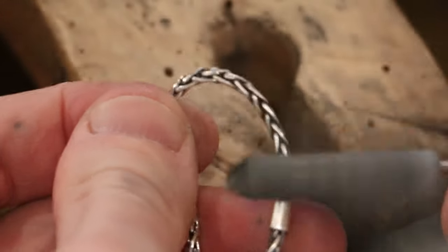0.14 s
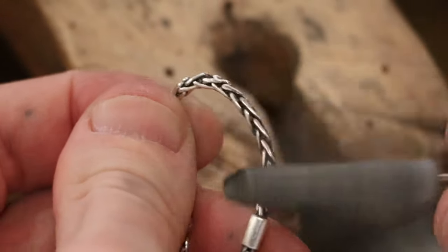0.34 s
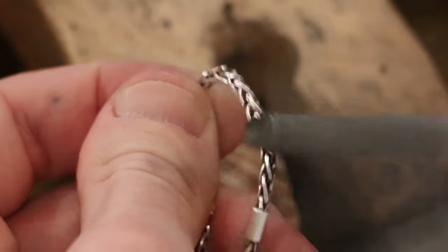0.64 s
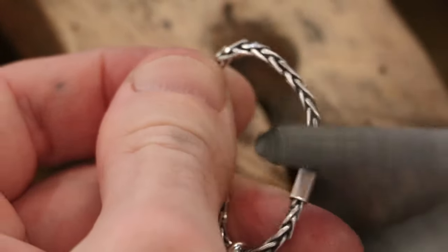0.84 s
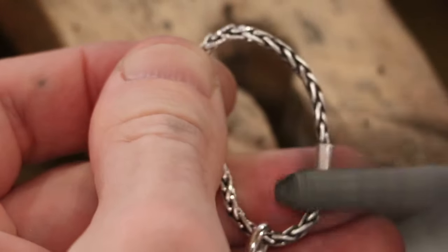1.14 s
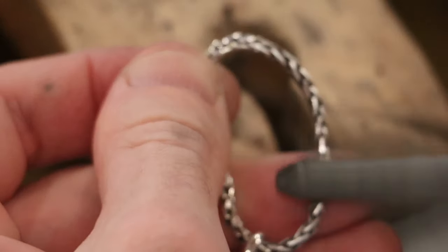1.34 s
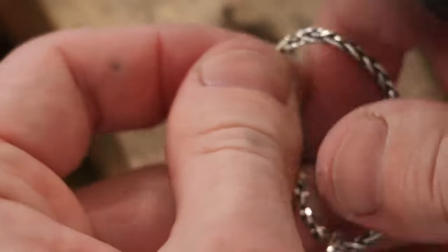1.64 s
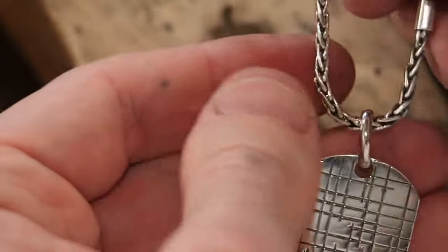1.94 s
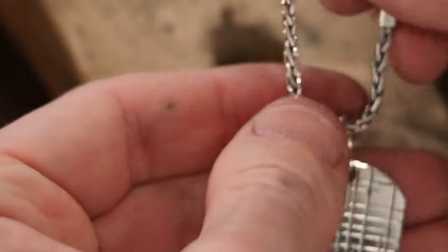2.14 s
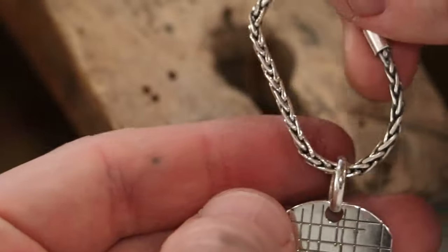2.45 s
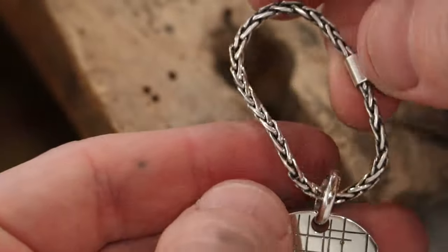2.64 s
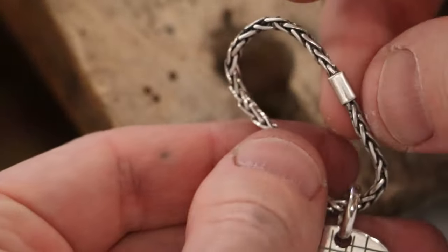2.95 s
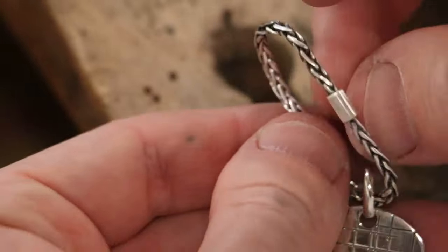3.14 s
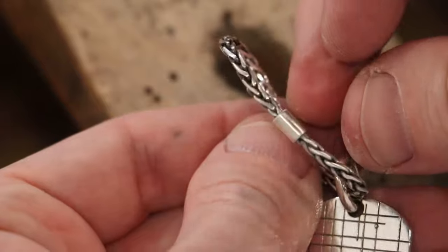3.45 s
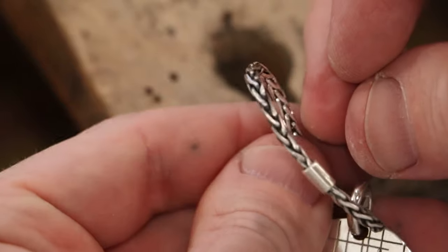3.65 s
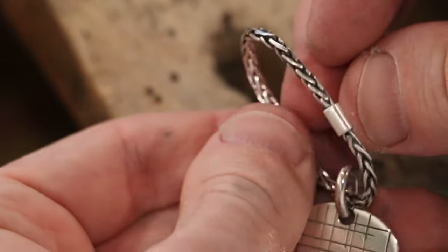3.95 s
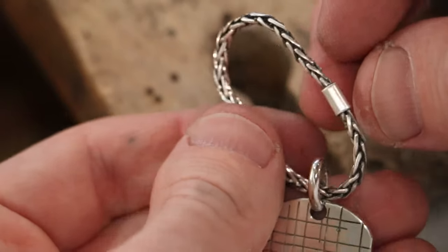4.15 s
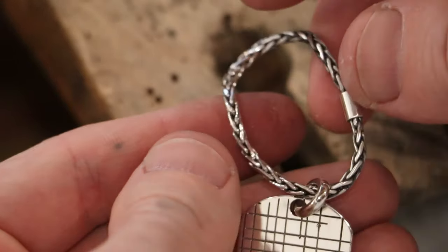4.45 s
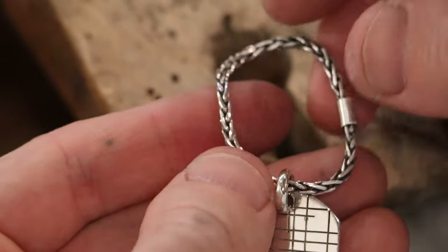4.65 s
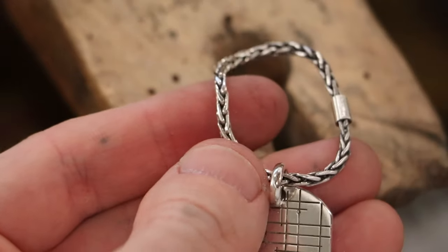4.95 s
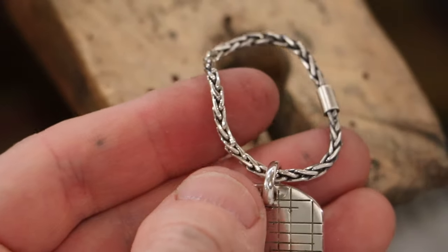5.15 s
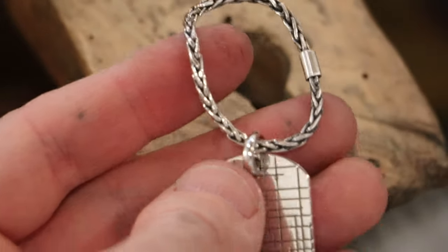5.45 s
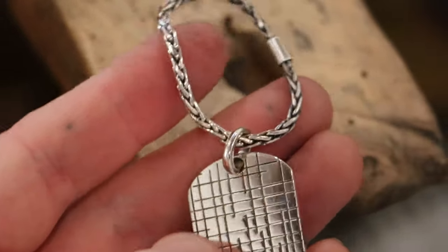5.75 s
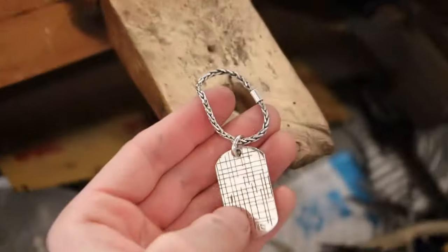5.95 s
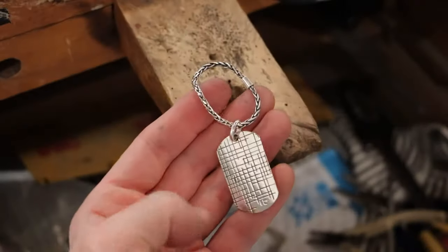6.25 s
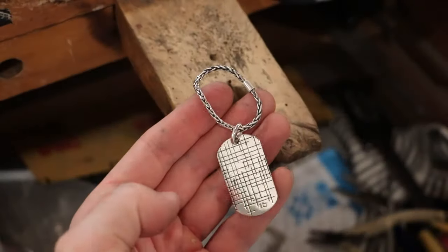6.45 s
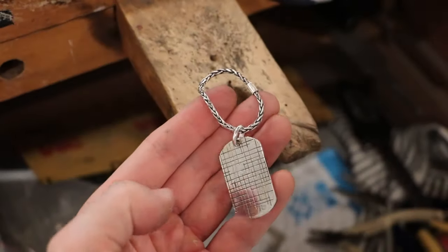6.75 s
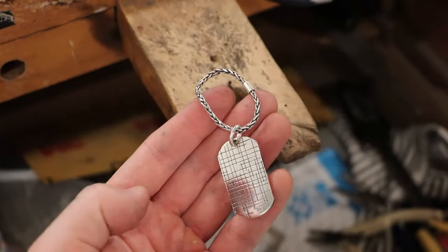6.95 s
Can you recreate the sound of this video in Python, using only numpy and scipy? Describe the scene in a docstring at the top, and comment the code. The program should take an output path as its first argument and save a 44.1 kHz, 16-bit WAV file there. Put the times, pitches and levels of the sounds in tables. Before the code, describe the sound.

Close gritty grinding on fine metal links, a hissing spindle coasting to a stop over a low hum, then wooden knocks and faint chain clicks.

```python
"""Rotary handpiece on a silver chain

An abrasive roll runs over a silver chain at a wooden bench, close by: grit rasps in filtered impact noise,
the roll throbs in sines locked to the shaft angle, and the metal squeals in a wandering sine.
The spindle then coasts down on hissing bearings (noise whose level follows the speed) over a two-tone motor hum.
The hum stops, knocks ring the bench as decaying modes, something scuffs on it, the chain ticks and a hand
brushes past in a quiet workshop."""
import sys
import numpy as np
from scipy import signal
from scipy.fft import rfft, irfft, next_fast_len
from scipy.io import wavfile
from scipy.ndimage import uniform_filter1d

SR = 44100
rng = np.random.default_rng(int(sys.argv[2]) if len(sys.argv) > 2 else 0)


def log_audio(samples):
    """Write samples as a 16-bit WAV file to the path given in sys.argv[1]."""
    # one column per channel
    frames = np.atleast_2d(samples).T
    # limit to full scale, then quantise
    limited = np.clip(frames, -1, 1)
    pcm = np.round(limited * 32767).astype(np.int16)
    wavfile.write(sys.argv[1], SR, pcm)


N = 312713
T = np.arange(N) / SR

# the roll leaves the piece; the bearings and the hum end
LIFT_S, STOP_S = 1.6, 5.04
# spindle under power, sagging as the roll bears on the chain: t/s, rotation f/Hz
DRIVE = [(0.0, 99.86), (0.2, 99.4), (0.226, 97.55), (0.672, 93.67), (0.712, 97.04), (0.784, 93.84),
         (1.412, 93.2), (1.572, 95.1), (1.6, 94)]
# the roll judders on the links: t/s, length/s, rise of the 4th multiple of the turn/dB, change of the 3rd/dB
JUDDERS = [(0, 0.12, 11, -2), (0.227, 0.014, 8, -7), (0.747, 0.1, 13.5, -8), (1.148, 0.13, 13.5, 0.5),
           (1.307, 0.25, 10.5, -2)]
JUDDER_FADE_S = 0.024
CHATTER_SHARE = 1  # share of each change in pressing that reaches chatter, overtones and links
RATTLE_LAW = (-38, 0.72)  # level at full speed in dB, power of the speed that the amplitude follows


def undb(db):
    """Amplitude ratio from a level: 20 dB is a factor of ten."""
    return 10 ** (np.asarray(db) / 20)


def curves(rows):
    """Linear interpolation in time of each column after the first."""
    s, *columns = np.transpose(rows)
    return [np.interp(T, s, c) for c in columns]


def between(start, end, fade):
    """Gating: fully open from start to end, with linear slopes outside."""
    return np.clip((T - start) / fade + 1, 0, 1) * np.clip((end - T) / fade + 1, 0, 1)


def noise():
    """White noise: independent Gaussian samples."""
    return rng.standard_normal(N)


def walk(rate):
    """Band-limited chance: random steps at a rate in Hz, smoothed twice and scaled to a spread of 1."""
    k = max(int(SR / rate), 1)
    steps = np.repeat(rng.standard_normal(N // k + 1), k)
    smooth = uniform_filter1d(uniform_filter1d(steps, k), k)[:N]
    return smooth / smooth.std()


def colour(x, points, size=4096):
    """Minimum-phase filtering: a folded cepstrum makes the outline (f/Hz, level/dB) causal."""
    hz, db = np.transpose(points)
    f = np.maximum(np.arange(size // 2 + 1) * SR / size, 1)
    cepstrum = irfft(np.log(undb(np.interp(np.log(f), np.log(hz), db))))
    cepstrum[1:size // 2] *= 2
    cepstrum[size // 2 + 1:] = 0
    response = irfft(np.exp(rfft(cepstrum)))
    return signal.oaconvolve(x, response)[:N]


def unit(x, above=0):
    """Parseval's theorem: scale so that the part above a frequency in Hz has rms 1."""
    size = next_fast_len(N)
    power = np.abs(rfft(x, size)[int(above * size / SR):]) ** 2
    return x / np.sqrt(2 * power.sum() / size / N)


def grit(rate, scatter_db):
    """Shot noise: random impacts, rate per second, of very unequal size."""
    hits = rng.random(N) < rate / SR
    size_db = scatter_db * np.minimum(rng.exponential(size=N), 5)
    return unit(hits * noise() * undb(size_db))


def fall(start, t60, rise=1e-5):
    """Exponential decay by 60 dB in t60 seconds after a quick rise at start."""
    decay = np.exp(-np.log(1000) * np.clip(T - start, 0, 4 * t60) / t60)
    return np.clip((T - start) / rise + .5, 0, 1) * decay


def held(start, length, attack, t60):
    """Exponential release: full from start for a length in s, after a squared rise that ends at start."""
    release = np.exp(-np.log(1000) * np.maximum(T - start - length, 0) / t60)
    return np.clip((T - start) / attack + 1, 0, 1) ** 2 * release


def swell(start, length):
    """Raised-sine window: one rounded rise and fall."""
    return np.sin(np.pi * np.clip((T - start) / length, 0, 1)) ** 2


def swells(rows):
    """Superposition of rounded changes: t/s, length/s, height/dB."""
    return sum(height * swell(s, length) for s, length, height in rows)


def bursts(rows, width):
    """Ring modulation: slow noise times a tone is a band whose width is a share of its centre frequency."""
    total = 0
    for s, length, hz, db in rows:
        band = walk(hz * width) * np.sqrt(2) * np.sin(2 * np.pi * hz * T)
        total = total + undb(db) * swell(s, length) * band
    return total


def spread(x, width, lean, t60, size=16384):
    """Mid-side stereo: diffuse reflections form the side signal, and level differences lean it to one ear.

    width: f/Hz, side against mid level/dB; lean: f/Hz, left minus right level/dB."""
    spray = rng.standard_normal(size) * fall(0, t60)[:size]
    side = colour(signal.oaconvolve(x, spray / np.linalg.norm(spray))[:N], width)
    length = next_fast_len(N + size)
    spectrum = rfft(x, length)
    hz, db = np.transpose(lean)
    f = np.arange(len(spectrum)) * SR / length
    ratio = undb(np.interp(np.log1p(f), np.log(hz), db))
    side = side + irfft(spectrum * (ratio - 1) / (ratio + 1), length)[:N]
    return np.array([x + side, x - side])


def from_right(pair):
    """Interaural delay: sound from the right reaches the left ear three samples later."""
    return np.array([np.interp(T - 3 / SR, T, pair[0]), pair[1]])


def speed():
    """Braked rotation in turns per second: driven, then slowed by viscous drag and dry friction."""
    drag_per_s, friction_hz_per_s = 0.52, 6.5
    driven, = curves(DRIVE)
    brake = friction_hz_per_s / drag_per_s
    coasting = np.exp(-drag_per_s * np.maximum(T - LIFT_S, 0))
    return np.maximum((driven + brake) * coasting - brake, 1)


def with_speed(db, power):
    """Power law: level in dB of a part whose amplitude follows a power of the coasting speed."""
    return db + power * 20 * np.log10(np.minimum(speed() / DRIVE[-1][1], 1))


def sings(hz, width_hz, rise_db):
    """Resonance: rise in dB as the spindle passes a critical speed in turns per second."""
    return rise_db * np.exp(-((speed() - hz) / width_hz) ** 2)


def shaft_angle():
    """Phase as integrated speed: spindle angle in radians, fluttering more under load."""
    flutter = .002 * walk(40) + .005 * walk(16) * between(0, LIFT_S, .05)
    return 2 * np.pi * np.cumsum(speed() * (1 + flutter)) / SR


def roll(angle):
    """Forced vibration: an out-of-round roll shakes once a turn and, in contact, beats at multiples of it."""
    # the roll skips over the chain and shakes more: t/s, length/s, rise/dB
    skips = [(-.2, 0.49, 7), (.4, 0.64, 7), (.67, .13, 3.5)]
    second_db, third_db, fourth_db = -34, -29.5, -40  # multiples of the turn
    contact = between(0, LIFT_S - .03, 0.025)
    for s, length, rise_db, change_db in JUDDERS:
        gate = between(s, s + length, JUDDER_FADE_S)
        third_db = third_db + change_db * gate
        fourth_db = fourth_db + rise_db * gate
    beats = 0
    for k, db in enumerate((second_db, third_db, fourth_db), 2):
        tone = np.sin(k * angle + rng.uniform(0, 2 * np.pi))
        beats = beats + undb(db + 2.0 * walk(30.15)) * tone
    # the piece holds the shake down; once free, it dies with the speed and settles
    loaded = undb(-41.5 + swells(skips) + walk(9.1))
    free = undb(with_speed(-29, power=5.9)) * between(0, 2.23, .05)
    return (loaded * contact + free * (1 - contact)) * np.sin(angle) + beats * contact


def surface(angle, life, size=440):
    """Cyclic memory: the grit pattern returns every turn and wears into a new one over a life in turns."""
    turns = angle / (2 * np.pi)
    keep = np.exp(-1 / life)
    fresh = rng.standard_normal((int(turns[-1]) + 60, size))
    worn = signal.lfilter([np.sqrt(1 - keep ** 2)], [1, -keep], fresh, axis=0)
    pattern = worn[50:].ravel()
    return unit(np.interp(turns * size, np.arange(len(pattern)), pattern))


def overtones(angle):
    """Harmonic series: upper multiples of the turn buzz in the chain, the lowest growling up in a judder."""
    # sharper bumps of the roll: multiple of the turn, level/dB
    harmonics = [(5, -46), (6, -50), (7, -47), (8, -52), (9, -46), (10, -47), (11, -48), (12, -44),
                 (14, -47), (20, -45), (23, -46)]
    judder_db = 3.5 * sum(between(s, s + length, JUDDER_FADE_S) for s, length, _, _ in JUDDERS)
    total = 0
    for k, db in harmonics:
        gain = undb(db + judder_db * (k < 9) + 2.5 * walk(14))
        total = total + gain * np.sin(k * angle + .5 * walk(30) + rng.uniform(0, 2 * np.pi))
    return total


def links():
    """Driven resonance: scraped links sound as noise bands that drift and flare as the roll travels and bites."""
    # resonances of the links under the roll: f/Hz, modulating noise rate/Hz, level/dB
    resonances = [(2150, 500, -35.5), (3073, 800, -35), (7060, 960, -41.5)]
    total = 0
    for hz, width, db in resonances:
        drifting_hz = hz * (1 + .08 * walk(7))
        tone = np.sin(2 * np.pi * np.cumsum(drifting_hz) / SR)
        total = total + undb(db + 1.5 * walk(34.9)) * walk(width) * tone
    return total


def grinding(angle):
    """Abrasion noise: grit cuts hardest once a turn in flickering bands, and bumps that return buzz."""
    # the hand presses harder, or eases off: t/s, length/s, change/dB
    presses = [(-.1, 0.29, 2), (.15, 0.083, 3), (.745, 0.1, 3.5), (.79, 0.16, 3.5), (.94, 0.064, -3.5),
               (1.45, 0.06, 1.5)]
    # outline of the rasp: f/Hz, level/dB
    rasp_outline = [(880, -24), (1500, -2.5), (1580, -18.5), (2050, -1.5), (2460, -0.5), (3010, 3),
                    (4370, -4), (4730, -1), (5480, -4.5), (6880, -1), (8250, -5.5), (9080, -7),
                    (11200, -11), (12000, -14.5), (15600, -33.5), (22000, -120)]
    # answer of chain and fingers to the roll's bumps: f/Hz, level/dB
    buzz_outline = [(380, -36.5), (480, 4), (600, 3), (660, 2), (740, -8.5), (840, 5.5), (1000, -3.5),
                    (1130, 3.5), (1300, 0), (1550, -8.5), (1900, -1.5), (2600, -16), (5000, -37.5)]
    # outline of the scrubbing chatter: f/Hz, level/dB
    chatter_outline = [(29, -38), (50, -23), (81, -12.5), (128, -14.5), (183, -1), (234, -12.5),
                       (290, -4.5), (329, -9), (522, -15.5), (760, -14.5), (1000, -11.5), (2000, -13.5),
                       (2600, -33.5), (4400, -120)]
    base_rasp_db, base_chatter_db = -27, -34
    effort_db = swells(presses)
    rasp_db = base_rasp_db + effort_db + .7 * walk(21.96)
    chatter_db = base_chatter_db + CHATTER_SHARE * effort_db + walk(30)

    press = unit(undb(.5 * np.cos(angle) + .8 * walk(70)))
    snags = undb(-8) * grit(300, 1.6)
    impacts = grit(9000, 0.95) + snags + undb(-1.5) * surface(angle, life=3.7)
    cuts = colour(impacts * press, rasp_outline)
    # below and above 4300 Hz the rasp flickers independently
    coarse = signal.sosfiltfilt(signal.butter(2, 4300, fs=SR, output="sos"), cuts)
    rasp = coarse * undb(1.1 * walk(44.83)) + (cuts - coarse) * undb(1.5 + 1.1 * walk(44.67))
    buzz = colour(surface(angle, life=7.3), buzz_outline)
    contact = between(0, LIFT_S - .015, 0.037)
    # rms 1 while in contact
    rasp, buzz = (v / np.sqrt(np.average(v ** 2, weights=contact)) for v in (rasp, buzz))
    scrub = unit(colour(noise() * press, chatter_outline), above=450)

    # the roll still brushes the chain as it comes away
    graze = rasp * undb(base_rasp_db - 8) * fall(LIFT_S, t60=1.2, rise=.02)
    singing = (overtones(angle) + links()) * undb(CHATTER_SHARE * effort_db)
    chatter = (undb(-4.0 + 0.74 * walk(17.99)) * buzz + undb(-2.0) * scrub) * undb(chatter_db)
    return graze + (singing + rasp * undb(rasp_db) + chatter) * contact


def squeal():
    """Stick-slip friction excites one high mode of the silver; the tone swells, wanders and stutters."""
    # two spells, each a curve ahead of the common trim: t/s, level/dB
    spells = [
        [(0.0, -32.5), (0.03, -29.5), (0.064, -52), (0.114, -23), (0.144, -41.5), (0.194, -36), (0.22, -57),
         (0.242, -26), (0.258, -26), (0.28, -62)],
        [(1.06, -47), (1.086, -40), (1.16, -44), (1.178, -36.5), (1.246, -42), (1.274, -34), (1.336, -33),
         (1.364, -45), (1.382, -30.5), (1.52, -48)],
    ]
    hz = 8860 + 22 * walk(18) + 42 * walk(450)
    strength = sum(undb(curves(rows)[0]) * between(rows[0][0], rows[-1][0], .02) for rows in spells)
    throb = undb(-0.5 + 2 * walk(130))  # trim and throb in dB
    return np.sqrt(2) * strength * throb * np.sin(2 * np.pi * np.cumsum(hz) / SR)


def hum():
    """Motor tones: the lower swells off load and sags as the upper, heard only off load, stops."""
    lower_hz, upper_hz = 179.1, 240.8
    loaded_db, free_db, upper_db, sag_db = -40, -36.5, -41, -6
    swell_s, upper_end_s, release_s = 0.87, 4.85, 0.031
    free = np.clip((T - LIFT_S) / swell_s, 0, 1)
    running = between(0, upper_end_s, release_s)
    lower_db = loaded_db + (free_db - loaded_db) * free + sag_db * (1 - running)
    lower = undb(lower_db) * between(0, STOP_S, release_s)
    upper = undb(upper_db) * np.sqrt(free) * running
    total = 0
    for hz, gain in ((lower_hz, lower), (upper_hz, upper)):
        phase = 2 * np.pi * np.cumsum(hz * (1 + .004 * walk(12))) / SR
        total = total + gain * undb(.9 * walk(18)) * np.sin(phase)
    return np.sqrt(2) * total


def workshop():
    """Diffuse background noise: quiet room air with the soft, blurred drone of a fan."""
    # outline of the room air: f/Hz, level/dB
    air_outline = [(15, -38), (25, -14.5), (59, -10.5), (93, -12), (323, -13), (407, -3), (451, -12),
                   (861, -16), (1300, -23.5), (1480, -25.5), (12000, -50), (15600, -81.5), (22000, -120)]
    air = unit(colour(noise(), air_outline)) * undb(-49.46 + 1.0 * walk(11.0))
    fan = undb(-64) * walk(30) * np.sin(2 * np.pi * 404 * T)
    return air + fan


def catches():
    """Resonant scraping: where the roll snags on a link, a noise band swells briefly."""
    # t/s, length/s, scrape f/Hz, level/dB
    snag_rows = [(.119, 0.026, 2740, -22.5), (.175, 0.056, 2500, -33), (.165, 0.089, 6000, -30),
                 (.395, 0.038, 2405, -27), (.688, 0.048, 1897, -22.5), (.175, 0.037, 1098, -30),
                 (.695, 0.035, 1202, -32.5), (.775, 0.041, 5000, -27), (.8, 0.085, 3370, -27),
                 (.835, 0.052, 5630, -26), (.905, 0.044, 2503, -25.5), (.912, .024, 5870, -24.5),
                 (1.07, 0.035, 7220, -26), (1.558, 0.037, 3153, -23.5), (1.57, 0.028, 5860, -25),
                 (1.579, 0.04, 10000, -25)]
    return bursts(snag_rows, width=.8)


def whirr():
    """Moving resonance: an airy band of the coasting bearings climbs, flares and sinks, fluttering."""
    # t/s, centre f/Hz, level/dB
    path = [(1.66, 4800, -41), (1.72, 4700, -35.5), (1.82, 4850, -44), (1.9, 4900, -47),
            (2.17, 5400, -40.5), (2.27, 5800, -39), (2.41, 5700, -45), (2.66, 5600, -44.5),
            (2.88, 5500, -42), (3.05, 5400, -47.5), (3.601, 5300, -56)]
    hz, db = curves(path)
    band = np.sqrt(2) * walk(1100) * np.sin(2 * np.pi * np.cumsum(hz) / SR)
    return band * undb(db + 1.5 * walk(39.67)) * between(path[0][0], path[-1][0], 0.12)


def bearings(angle):
    """Rolling-contact noise: balls rattle round their races in pulses that slow and soften with the speed."""
    # the coasting noise swells for a moment: t/s, length/s, rise/dB
    rubs = [(1.618, 0.41, 2.5), (1.946, 0.13, 11.5), (4.72, 0.47, 8)]
    # outlines of the four parts: f/Hz, level/dB
    rattle_outline = [(760, -35.5), (1300, -6.5), (1410, -5.5), (1530, -11), (1790, -5), (1980, 2.5),
                      (2170, -2), (2350, 3.5), (2930, 6.5), (3460, -0.5), (4600, -5), (5980, -51),
                      (10100, -120)]
    ring_outline = [(3400, -22.5), (4300, 0), (5100, 3.5), (5700, 1), (6200, 0), (6700, -7), (7500, -35.5)]
    hiss_outline = [(5500, -6), (7000, 9), (7800, 6), (8700, 5), (10300, 5.5), (11500, -9), (12200, -73)]
    rumble_outline = [(25, -13), (55, -7), (110, 7.5), (160, 9), (280, 12.5), (350, -2), (520, 3.5),
                      (720, 2), (950, -17.5), (1130, -0.5), (1350, -63), (2000, -38)]
    rub_share = 0.57  # of a swell's rise in rattle and ring; the hiss takes all of it
    rub_db = sum(db * np.sqrt(swell(s, length)) for s, length, db in rubs)
    rattle_db = with_speed(*RATTLE_LAW) + rub_share * rub_db
    ring_db = with_speed(-39.5, power=0.96) + rub_share * rub_db
    hiss_db = with_speed(-43.5, power=1.01) + rub_db
    shake_db = sings(hz=26, width_hz=12, rise_db=2.13)

    turn = unit(undb(1.0 * np.cos(angle) + 0.72 * walk(45)))
    balls = grit(11000, 0.32) * turn
    rattle = unit(colour(balls, rattle_outline)) * undb(rattle_db + shake_db + 1.3 * walk(50))
    ring_gain = undb(ring_db + sings(hz=60, width_hz=23, rise_db=3.4))
    ring = unit(colour(balls, ring_outline)) * ring_gain
    hiss = unit(colour(balls, hiss_outline)) * undb(hiss_db)
    rumble_gain = undb(with_speed(-44.5, power=0.21) + shake_db)
    rumble = unit(colour(noise() * turn, rumble_outline), above=304) * rumble_gain
    # the roll stirs the air, fading with the hiss
    stirred = colour(noise() * turn, [(400, -34.0), (800, 9.5), (1100, 10.0), (1300, -10.0), (1700, -10),
                                      (2400, -2), (5000, -28)])
    swish = unit(stirred) * undb(hiss_db - 5)
    # the motor's twelve slots whine faintly while it is still fast
    whine_gain = undb(-9 + with_speed(*RATTLE_LAW) + 3 * walk(25)) * between(1.65, 1.85, .4)
    whine = whine_gain * np.sin(12 * angle + .6 * walk(60))
    return (rattle + ring + hiss + rumble + swish + whine + whirr()) * between(1.58, STOP_S, 0.1)


def knocks(size=16384):
    """Modal impact: weight drives the low bench modes and clack the upper, with contact noise and a room tail."""
    # blows: t/s, thump level/dB, wooden clack level/dB (of the modes), dry crack level/dB, hard edge level/dB
    blows = [(1.626, -28.5, -22, -32, -46), (5.0861, -48, -19, -18.5, -39), (5.0928, -30, -22.5, -23, -50),
             (5.1, -20, -28, -35, -60), (5.268, -28.5, -47, -40, -26), (5.287, -27, -41, -48, -51),
             (5.311, -26, -33, -40, -48), (5.3154, -30, -22, -25, -38), (5.3235, -16.5, -20.5, -26, -34),
             (5.347, -46, -26, -40, -56), (5.374, -44, -34, -43, -48)]
    # bench modes: f/Hz, level/dB, t60/s
    bench_modes = [(92, -22, 0.39), (126.3, -3, 0.17), (138.7, -1, 0.13), (246, -28, 0.17),
                   (519, -7, 0.091), (645, -7.5, 0.09), (839, -9.5, 0.15), (886, -15, 0.14),
                   (975, -13, 0.17), (1146, -11, 0.08), (1540, -24, 0.11), (1624, -12, 0.06),
                   (2200, -25, 0.16), (2920, -22, 0.07)]
    # outline of the clack noise: f/Hz, level/dB
    clack_outline = [(30, -26), (90, -14), (150, -1.5), (250, 0), (334, -14), (504, 2), (848, -1),
                     (1260, -10), (1570, -7.5), (1770, -9), (2150, -20), (2370, -28), (2640, -20),
                     (4190, -45), (4500, -33), (5850, -49), (9900, -120)]
    clack_t60, edge_t60, crack_t60, tail_t60, rise = 0.065, 0.038, 0.022, 0.49, .004  # s
    thump_below_hz, contact_s, spot_detune = 300, .0012, .04
    # something scuffs on the bench between the blows and as it settles
    scuff_swell = swell(5.222, .175)
    scuff = np.sqrt(scuff_swell) * undb(2.8 * walk(120))
    # powers of the noise parts add up
    clack = (undb(-35.5) * scuff * scuff_swell) ** 2
    edge = (undb(-45.5) * scuff) ** 2
    crack, body = 0, np.zeros(N)

    hz, db, t60 = np.transpose(bench_modes)[:, :, None]
    low = hz < thump_below_hz
    decay = undb(db - 60 * T[:size] / t60) * np.minimum(T[:size] / contact_s, 1)
    spots = rng.uniform(-0.92, 1, (len(blows), 2, len(bench_modes), 1))
    for (s, thump_db, clack_db, crack_db, edge_db), spot in zip(blows, spots):
        # each blow lands on a new spot, which changes the upper modes
        phase, detune = np.where(low, 0, spot)
        mode_hz = hz * (1 + spot_detune * detune)
        tones = np.cos(2 * np.pi * mode_hz * T[:size] + np.pi * phase)
        modes = undb(np.where(low, thump_db, clack_db)) * decay * tones
        first = int(s * SR)
        body[first:first + size] += modes.sum(axis=0)
        tail = undb(-20) * fall(s, tail_t60, rise)
        # clack noise lies 4 dB under the drive of the modes
        clack = clack + (undb(clack_db - 4) * (fall(s, clack_t60, rise) + tail)) ** 2
        edge = edge + (undb(edge_db) * (fall(s, edge_t60, rise) + tail)) ** 2
        crack = crack + (undb(crack_db) * (fall(s, crack_t60, rise) + tail)) ** 2
    wooden = unit(colour(noise(), clack_outline))
    hard = unit(colour(noise(), [(1200, -5.5), (2800, 2.0), (4300, 0.5), (6500, -3.5), (8500, -11.0),
                                 (12000, -19)]))
    dull = unit(colour(noise(), [(100, -5), (600, 4.5), (1200, -3), (1900, -4.0), (2900, -10.0),
                                 (3800, -27), (8000, -36)]))
    return body + np.sqrt(clack) * wooden + np.sqrt(edge) * hard + np.sqrt(crack) * dull


def bumps():
    """Narrow-band impulses: dull bumps as the hands change grip."""
    # t/s, length/s, centre f/Hz, level/dB
    grip_rows = [(2.16, 0.24, 133, -38.5), (3.14, 0.28, 74.5, -46), (4.45, 0.14, 110, -44.5),
                 (5.817, 0.015, 600, -42.5), (5.85, 0.23, 207.3, -48), (6.01, .08, 650, -51),
                 (6.088, 0.0079, 301, -39), (6.096, .01, 503, -39)]
    return bursts(grip_rows, width=0.56)


def chain():
    """Decaying noise bands: links tick, two onsets roughen the start of the bench scuff, and a faint bed patters."""
    # links tick, and the rows at 5.2325 and 5.238 s mark the rough start of the scuff on the bench:
    # t/s, mids level/dB, treble level/dB
    contact_rows = [(4.981, -31, -49), (5.2325, -38, -44), (5.238, -40, -45), (5.3005, -49, -34.5),
                    (5.456, -42, -58), (5.543, -41, -53), (5.6566, -41.5, -36.5), (5.667, -44, -47),
                    (5.813, -42.5, -47), (5.822, -46, -52), (5.827, -42, -47)]
    rise = 0.001
    mids, highs = 0, 0
    for s, mid_db, high_db in contact_rows:
        ring = fall(s, 0.013, rise) + undb(-21) * fall(s, 0.4, rise)  # contact and room tail
        mids = mids + undb(mid_db) * ring
        highs = highs + undb(high_db) * ring
    dull = unit(colour(noise(), [(700, 2), (1700, 1.5), (4200, -3), (6000, -19)]))
    bright = unit(colour(noise(), [(3500, -16.0), (5500, 2), (9000, -4), (12000, -8)]))
    patter = unit(colour(grit(2500, 1), [(1000, -21), (4000, 1), (11000, -9)]))
    faint = patter * undb(-67) * between(3.0, 5.8, .1)
    return mids * dull + highs * bright + faint


def hand():
    """Friction noise: strokes of dense fine impacts in a soft and a bright band, over a dull shuffle."""
    # t/s, length/s, soft brushing level/dB, bright hiss level/dB
    stroke_rows = [(5.736, 0.015, -65, -57), (5.868, 0.018, -49.5, -55), (5.905, 0.084, -53, -49.5),
                   (5.985, 0.044, -48.5, -57), (6.178, 0.032, -46.5, -64)]
    # outline of the soft brushing: f/Hz, level/dB
    brush_outline = [(35, -52), (60, -9), (208, -3.5), (248, 0), (290, -2), (338, -13), (386, -31),
                     (602, -11), (1780, -9), (2080, -13), (2780, -14), (7050, -23.5), (12000, -56),
                     (15600, -56), (22000, -120)]
    soft_gain, bright_gain = 0, 0
    for s, length, soft_db, bright_db in stroke_rows:
        stroke = held(s, length, attack=0.028, t60=0.19)
        soft_gain = soft_gain + stroke * undb(soft_db)
        bright_gain = bright_gain + stroke * undb(bright_db)
    drag = undb(2 * walk(260) + 1.2 * walk(60))
    brushed = colour(colour(grit(8000, 1.8), brush_outline), [(4500, -10), (7000, -9.5)])
    soft = unit(brushed, above=1000) * soft_gain
    hissed = colour(grit(8000, 1.3), [(4000, -8.0), (6500, -2.0), (8500, -3), (11000, -6.0), (12000, -19)])
    bright = unit(hissed) * bright_gain
    shuffled = colour(grit(494, 1.2), [(60, -15), (200, 2.0), (900, 9), (1600, -15), (4000, -47)])
    shuffle = unit(shuffled) * undb(-48.5) * between(5.86, 6.11, 0.027)
    return drag * (soft + bright) + shuffle


def scene():
    """Superposition in stereo: tool, chain and hand to the right, bench in front, room all round."""
    # width of each source: f/Hz, side against mid level/dB
    grind_width = [(60, -19), (110, -25), (190, -40), (350, -24), (620, -11), (1120, -5), (2000, -2.5),
                   (3590, -3.5), (6450, -1.5), (11600, -2)]
    spin_width = [(60, -7), (110, -35), (190, -52), (350, -47), (620, -12), (1120, -4.5), (2000, -2.5),
                  (3590, -8), (6450, -2), (11600, -3)]
    room_width = [(60, -11.5), (110, -10.5), (190, -27), (350, -16), (620, -4), (1120, -1.5), (2000, 1),
                  (3590, -2), (6450, 1.5), (11600, -0.5)]
    # lean of each source: f/Hz, left minus right level/dB
    grind_lean = [(60, -1), (110, 0), (190, 0), (350, 0), (620, -.5), (1120, -1), (2000, -8.5), (3590, -6),
                  (6450, -3.5), (11600, -4.5)]
    spin_lean = [(1120, 2.5), (2000, -12), (3590, -10), (6450, -5.5), (11600, -10.5)]
    room_lean = [(60, -2), (110, -7.5), (190, 2.5), (350, -4.5), (620, -0.5), (1120, -3), (2000, -4),
                 (3590, -2), (6450, 0.5), (11600, 0)]
    angle = shaft_angle()
    work = spread(grinding(angle) + catches() + squeal(), grind_width, grind_lean, t60=0.25)
    spin = from_right(spread(bearings(angle), spin_width, spin_lean, t60=0.38) + hum())
    bench = spread(knocks(), [(120, -54), (500, -14), (1500, -4.0), (6000, 0.0)],
                   [(200, -0.12), (1000, 0), (5000, -1)], t60=0.11)
    near = spread(chain() + hand(), [(80, -4), (400, -3), (1500, 0.5), (6000, -0.5)],
                  [(100, -21), (500, -9), (1800, -6), (8000, -7)], t60=0.037)
    room = spread(workshop(), room_width, room_lean, t60=.4)
    # roll and bumps reach both ears alike
    return roll(angle) + bumps() + work + spin + bench + near + room


def record(dry):
    """Elliptic low-pass: the top is cut steeply above 11650 Hz."""
    return signal.sosfilt(signal.ellip(10, .2, 80, 11650, fs=SR, output="sos"), dry)


dry = scene()
out = record(dry)
log_audio(out)
```